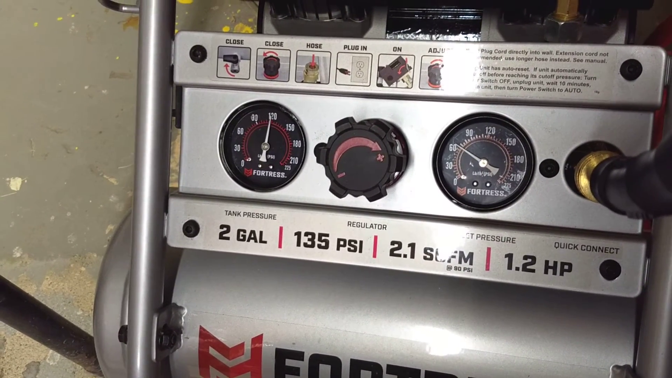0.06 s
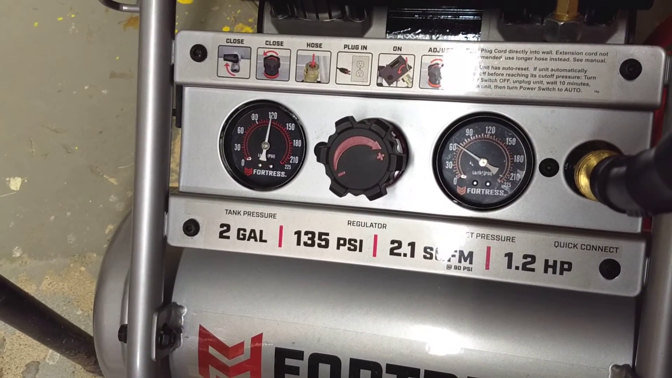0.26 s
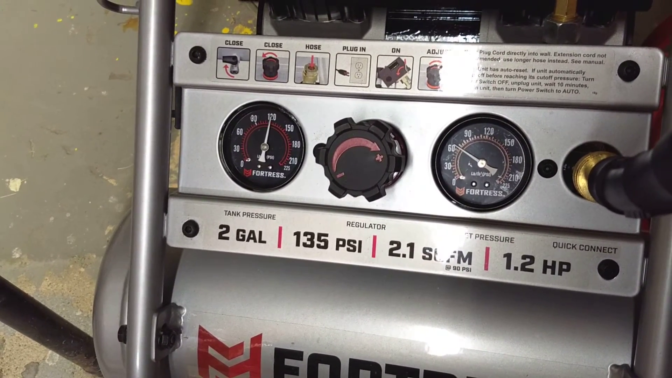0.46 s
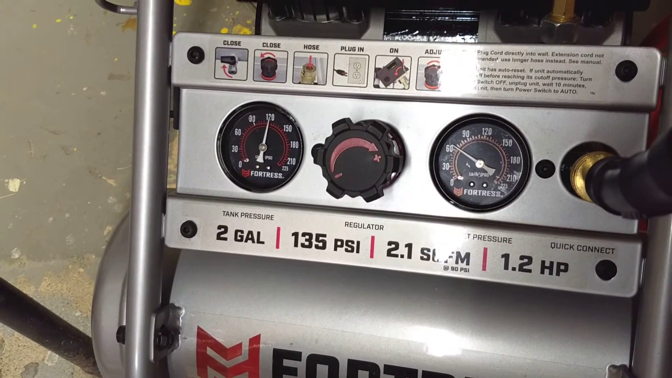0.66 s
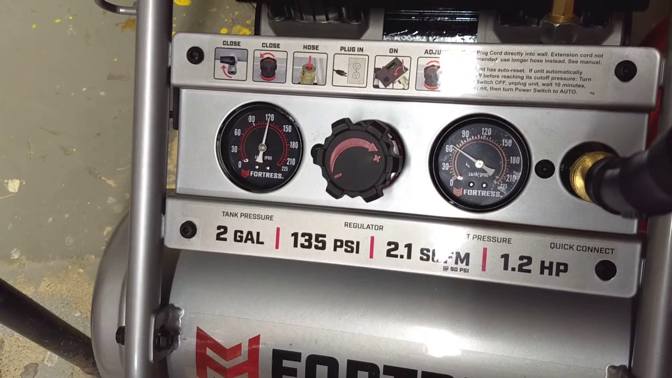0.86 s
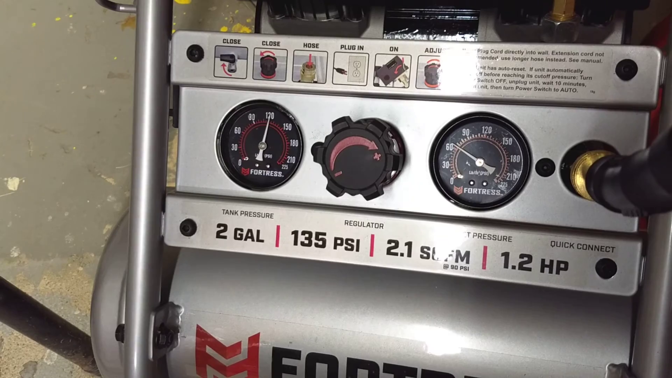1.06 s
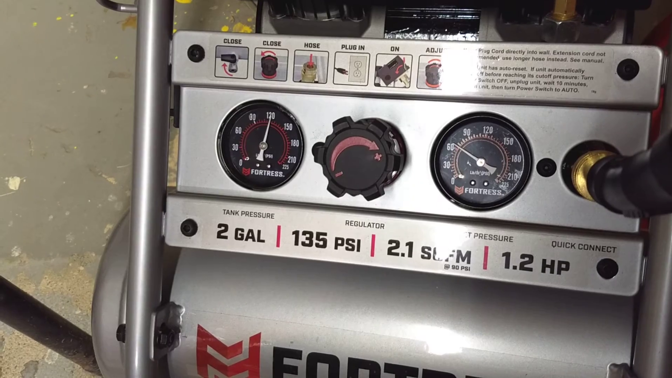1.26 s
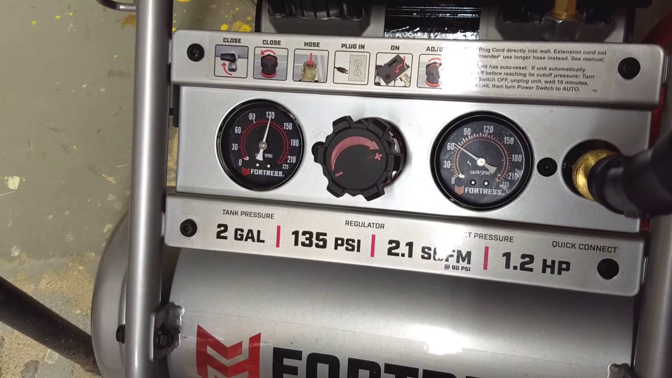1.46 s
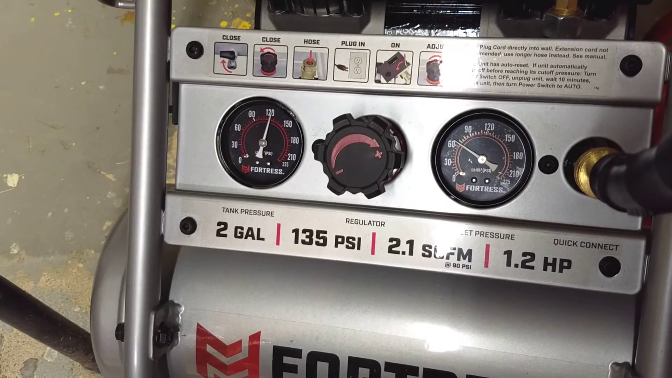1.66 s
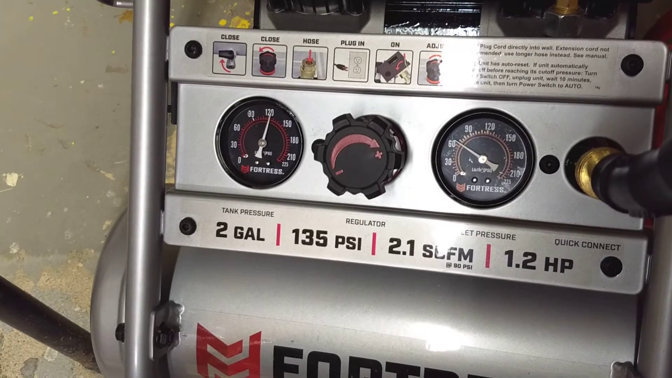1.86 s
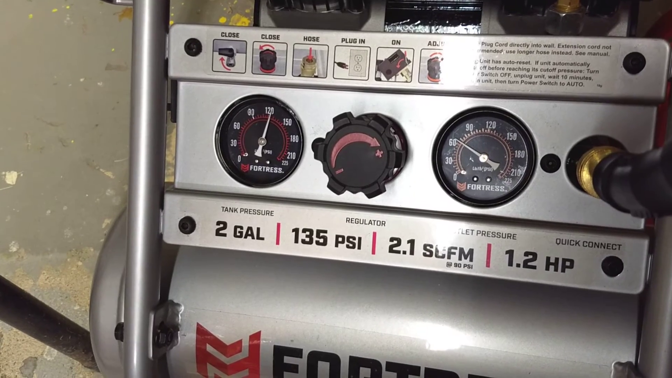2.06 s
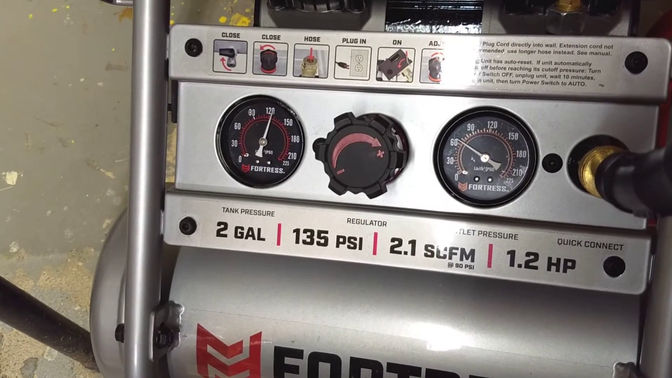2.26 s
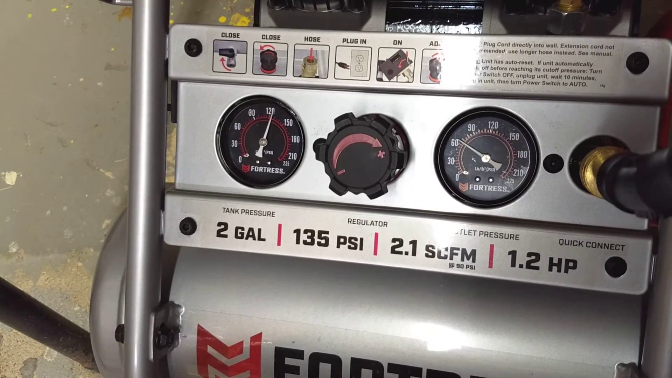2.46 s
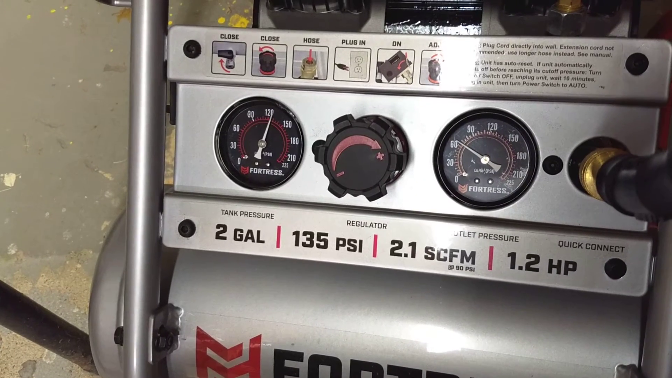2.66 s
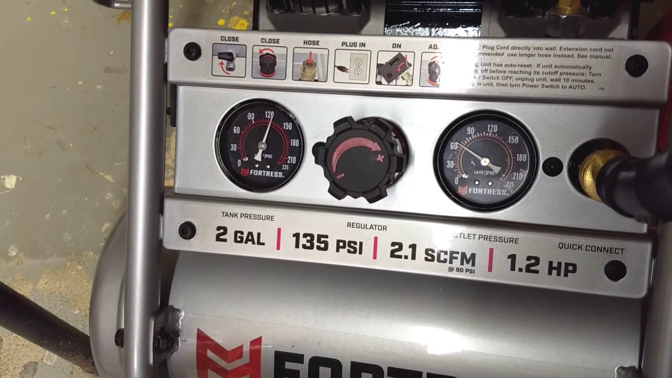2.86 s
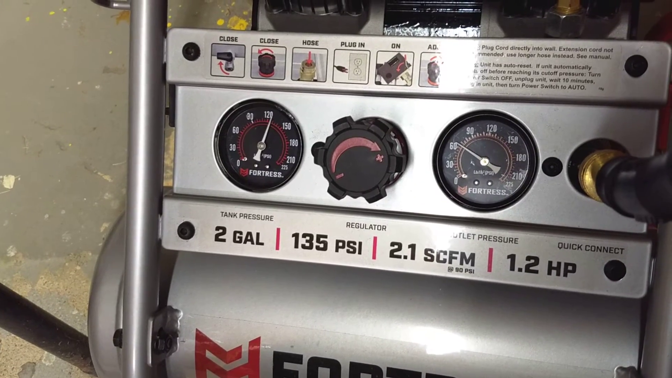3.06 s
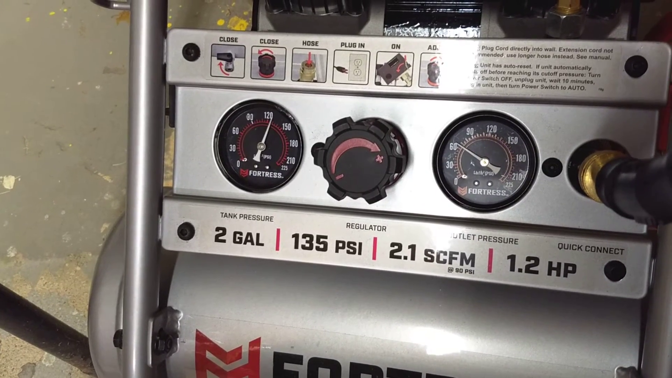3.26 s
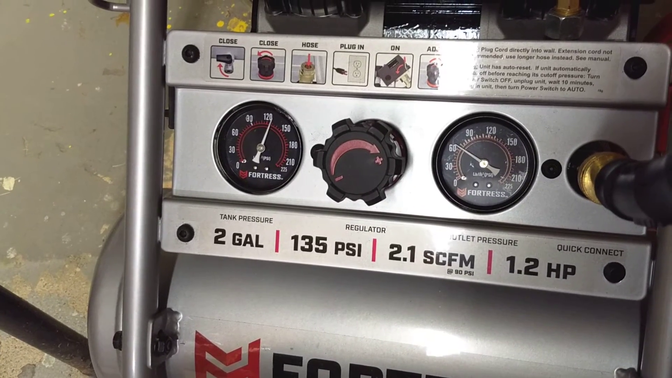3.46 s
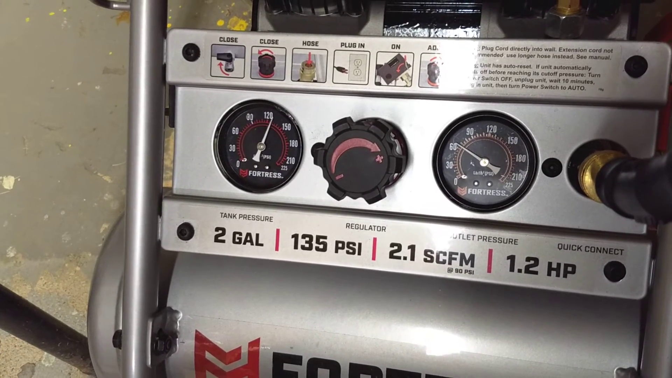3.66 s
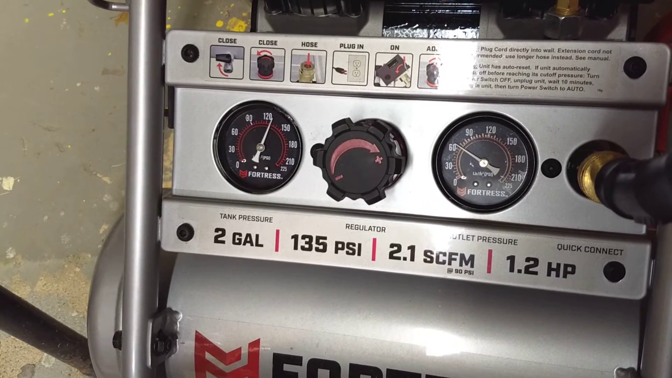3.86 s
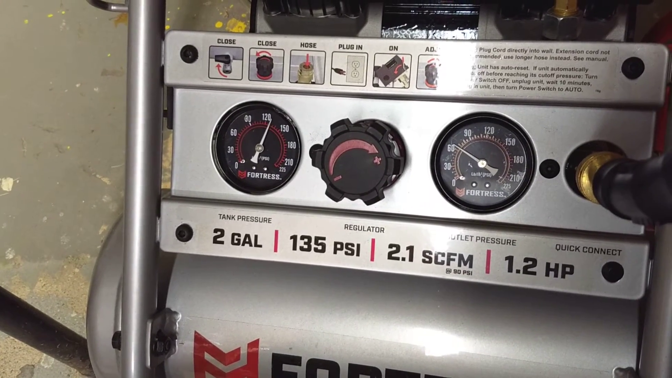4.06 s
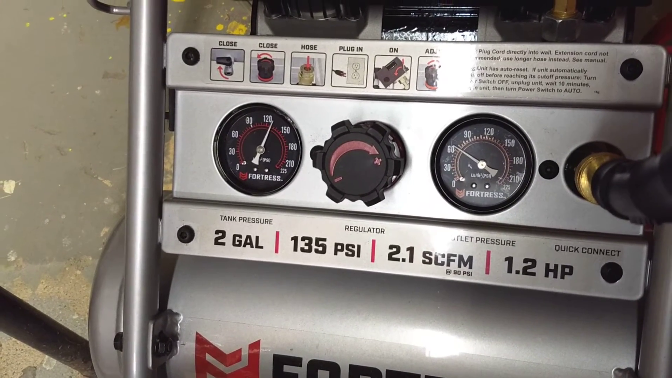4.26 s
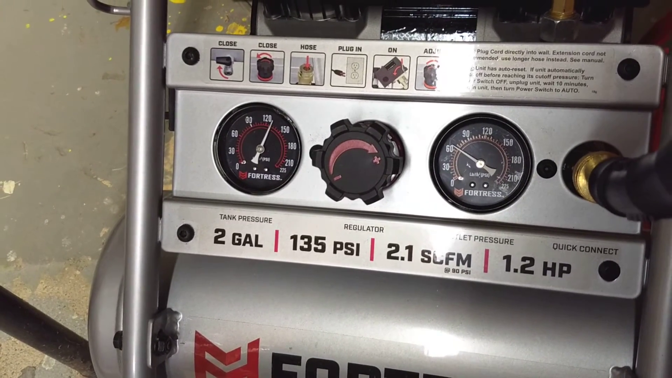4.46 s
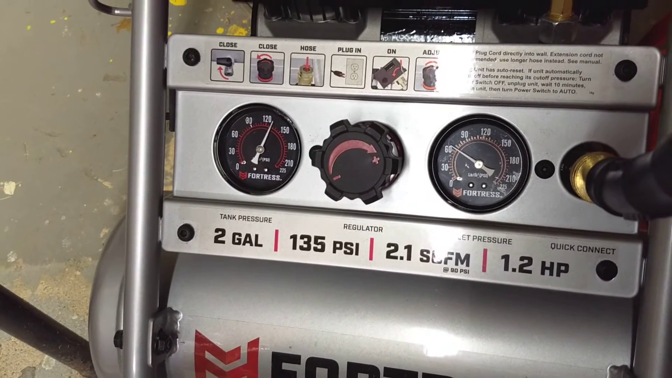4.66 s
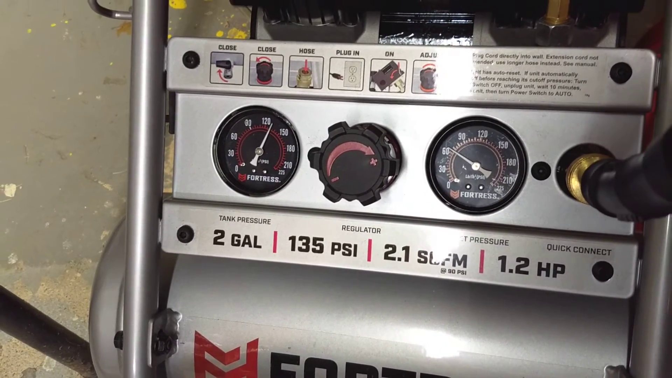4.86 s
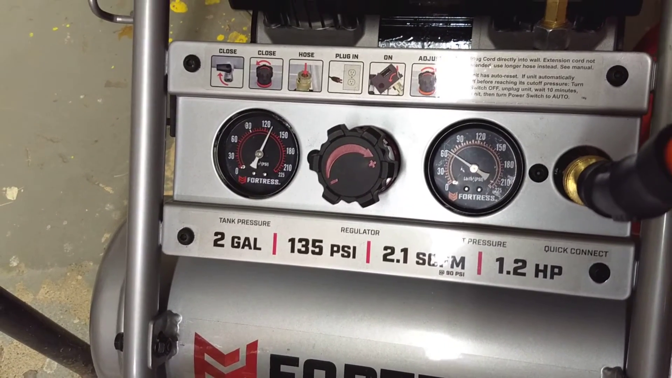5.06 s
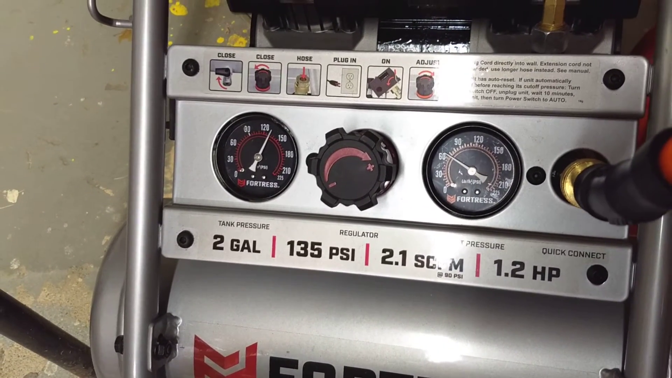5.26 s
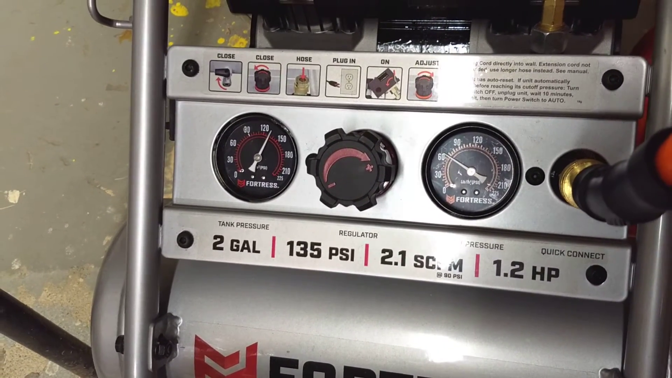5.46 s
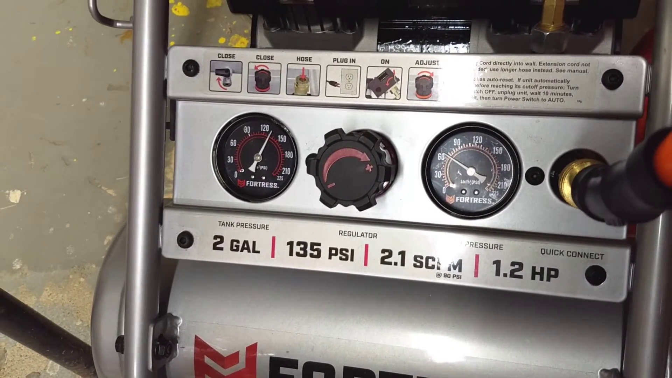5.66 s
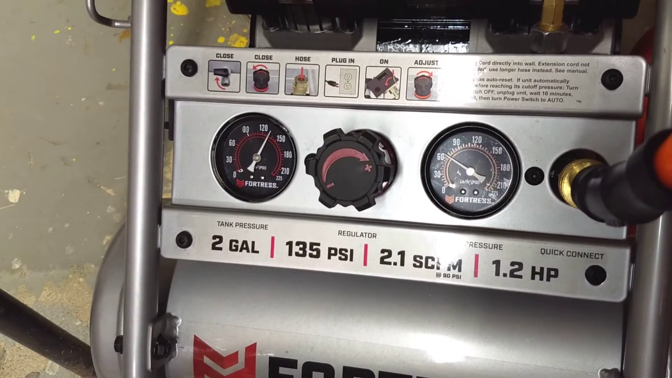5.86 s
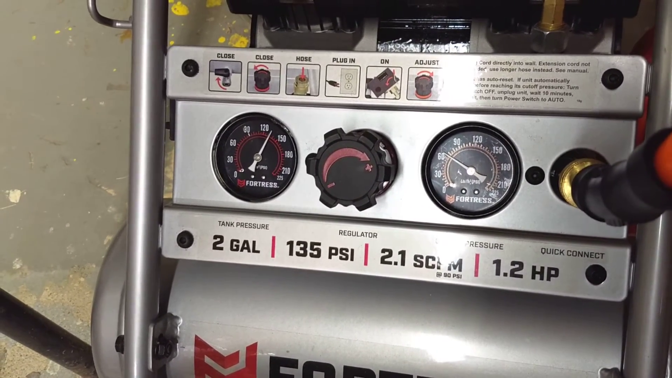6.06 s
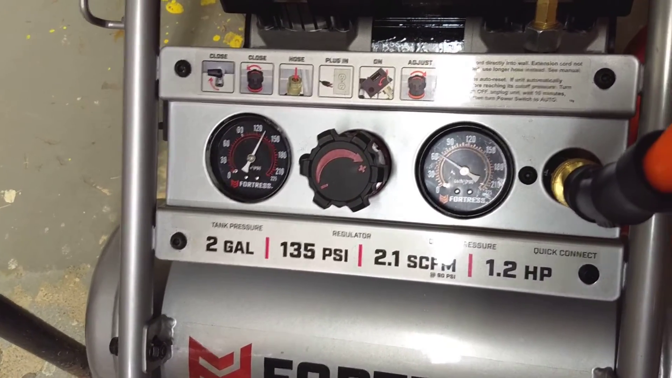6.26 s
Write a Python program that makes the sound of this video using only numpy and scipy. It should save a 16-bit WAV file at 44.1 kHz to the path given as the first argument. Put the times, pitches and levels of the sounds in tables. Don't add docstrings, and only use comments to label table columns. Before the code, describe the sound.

A little compressor fills its tank, its hard metallic stutter repeating about twenty-eight times a second over a humming motor. Thin rattling comes and goes a few times each second and grows slightly. After almost six seconds comes an abrupt click with small knocks, and the clatter gives way to a bright, slowly weakening air hiss. Close stereo microphones, compact indoor space, almost no reverberation.

```python
import sys
import numpy as np
from scipy import signal
from scipy.fft import rfft, irfft, next_fast_len
from scipy.io import wavfile
from scipy.ndimage import uniform_filter1d

SR = 44100
rng = np.random.default_rng(int(sys.argv[2]) if len(sys.argv) > 2 else 0)


def generate_wav(signal):
    frames = np.transpose(np.atleast_2d(signal))
    scaled = np.clip(frames, -1, 1) * 32767
    pcm = np.round(scaled).astype(np.int16)
    wavfile.write(sys.argv[1], SR, pcm)


def makeup_ratio(level_db):
    decades = np.asarray(level_db, float) / 20
    return 10 ** decades


N = 277830
T = np.arange(N) / SR
STOP_S = 5.8625


def read(points, hz, column=1):
    table = np.transpose(points)
    return np.interp(np.log(hz + 1), np.log(table[0] + 1), table[column])


def noise(colour, peaks):
    hz = np.fft.rfftfreq(N, 1 / SR)
    db = read(colour, hz)
    for f, width, top_db in peaks:
        db = db + top_db / (1 + (2 * (hz - f) / width) ** 2)
    return irfft(rfft(rng.standard_normal(N)) * makeup_ratio(db) * np.sqrt(SR / 2), N)


def ring(x, modes):
    t = T[:3000]
    strike = 0
    for hz, width, db in modes:
        strike = strike + makeup_ratio(db) * np.exp(-np.pi * width * t) * np.sin(2 * np.pi * hz * t)
    return signal.oaconvolve(x, strike)[:N]


# t/s, speed/(turns per s)
SHAFT_SPEED = [(0, 28.555), (6.3, 28.582)]


def motor():
    turns = np.cumsum(np.interp(T, *np.transpose(SHAFT_SPEED))) / SR
    hum = 120.047 * T - .18
    beat = hum - 4 * turns
    return turns, hum, beat


# hum multiple, shaft order, level/dB
FRAME_LINES = [(0, 2, -42), (0, 3, -55.5), (0, 4, -34.5), (0, 5, -41), (0, 6, -59), (0, 7, -51),
               (0, 8, -44.5), (0, 9, -42.5), (0, 10, -56), (0, 11, -49), (0, 12, -40.5), (0, 13, -47.5),
               (0, 14, -60), (0, 15, -61), (0, 16, -83), (0, 18, -53), (0, 19, -50), (1, 15, -52),
               (2, 10, -47.5), (3, 6, -50.5), (3, 8, -53), (1, 0, -36.5), (2, 0, -51), (1, 2, -46),
               (1, 5, -43.5)]


def frame(turns, hum):
    set_starts = {(0, 4): -.23, (1, 0): 0}
    out = 0
    for (m, k, db), start in zip(FRAME_LINES, rng.random(len(FRAME_LINES))):
        multiple, order = round(m), round(k)
        start = set_starts.get((multiple, order), start)
        phase = multiple * hum + order * turns + start
        out = out + np.sqrt(2) * makeup_ratio(db) * np.cos(2 * np.pi * phase)
    return out


def flutters(parts, turns, beat, sway, uneven_db, jitter):
    out = 0
    for angle, hz, length, db, gain_db in parts:
        stroke = np.floor(turns - angle + .5).astype(int) + 1
        push, late = rng.standard_normal((2, 200))[:, stroke]
        pull = 2 * np.pi * (beat - 0.85 + 0.15 * rng.uniform(-0.56, 1))
        away = turns - angle + 1 - stroke + jitter * late + 0.0028 * sway * np.sin(pull)
        spread = np.where(away < 0, .55, .38) * length
        swell = np.exp(-(away / spread) ** 2)
        filling_db = gain_db * (T / STOP_S - .5)
        force = makeup_ratio(db + filling_db + uneven_db * push) * (1 + sway * np.cos(pull))
        out = out + force * swell * np.cos(2 * np.pi * hz * away / SHAFT_SPEED[0][1])
    return out


# crank angle/turns, f/Hz, length/turns, level/dB, gain as the tank fills/dB
HEAD_FLUTTERS = [(.0571, 1100, .49, -24.1, 0), (.1286, 1430, .22, -24.3, 5), (.1619, 845, .49, -26.1, 3.5),
                 (.3041, 1019, .37, -19.4, -11), (.4564, 833, .13, -19.2, 0), (.5975, 881, .08, -24.2, -1),
                 (.6193, 1319, .49, -29.1, -3), (.6799, 920, .08, -15.6, -3), (.9414, 959, .35, -18.6, 0)]
PLATE_FLUTTERS = [(.2086, 1730, .24, -13.7, -.5), (.2418, 1922, .15, -26.5, 3.5),
                  (.3846, 1682, .08, -24.2, 0), (.6673, 1925, .29, -31.3, 3), (.7424, 1703, .24, -15.9, -1),
                  (.8892, 1640, .34, -25.1, 2)]
REED_FLUTTERS = [(.0761, 3380, .08, -32, -6), (.1439, 3880, .08, -33, -2), (.1993, 3380, .08, -25, -6),
                 (.2702, 3400, .05, -29, -5), (.3837, 3140, .12, -35, 12), (.6189, 2960, .08, -32, -1),
                 (.6319, 3580, .12, -32, -4), (.7572, 3400, .24, -28, 3), (.7873, 3820, .08, -34, 8),
                 (.8504, 3180, .12, -30, -9), (.9455, 3160, .08, -33, -3),
                 (.12, 2120, 0.15, -25, 0), (0.952, 1940, 0.39, -28, 13), (.24, 2410, 0.43, -23, -4),
                 (.43, 2820, 0.11, -29.5, 8), (.55, 2310, 0.51, -23, 2), (.8, 2170, .2, -35, -4),
                 (.92, 2630, 0.18, -30, -5)]


def valves(turns, beat):
    head = flutters(HEAD_FLUTTERS, turns, beat, sway=0.12, uneven_db=-1.4, jitter=0.00047)
    plate = flutters(PLATE_FLUTTERS, turns, beat, sway=0.021, uneven_db=0.25, jitter=0.00062)
    reeds = flutters(REED_FLUTTERS, turns, beat, sway=0.051, uneven_db=-0.1, jitter=0.00025)
    return makeup_ratio(0.55) * head + makeup_ratio(1.87) * plate + makeup_ratio(0.4) * reeds


SHROUD_SHAKE = [(2, .589, .65), (4, 1.551, .377), (5, .188, .986)]
# f/Hz, width/Hz, level/dB
PANEL_MODES = [(648, 35, -33.7)]
# f/Hz, width/Hz, level/dB
LIP_MODES = [(687.5, 40, -33.3), (775, 60, -41.7)]
# f/Hz, width/Hz, level/dB
SHROUD_MODES = [(645, 35, -25), (690, 40, -26), (545, 30, -31), (770, 60, -34), (1000, 90, -33),
                (1300, 90, -38)]


def shroud(turns, hum, beat, loose=.2):
    shake = np.cos(2 * np.pi * (hum + .639))
    for order, size, start in SHROUD_SHAKE:
        shake = shake + size * np.cos(2 * np.pi * (order * turns + start))
    play = 1.712
    touch = makeup_ratio(1.3) * np.maximum(shake - play, 0) ** 1.5
    together = np.maximum(np.cos(2 * np.pi * (beat - .77)) + loose, 0) ** .5
    chatter = makeup_ratio(-29.5) * together * rng.standard_normal(N)
    rattle = ring(touch, PANEL_MODES) - ring(touch, LIP_MODES) + ring(chatter, SHROUD_MODES)
    rattle = rattle * makeup_ratio(3 * (T / STOP_S - 1.0))
    return signal.sosfiltfilt(signal.butter(3, 520, "highpass", fs=SR, output="sos"), rattle)


# f/Hz, level/(dB per Hz)
RUSH_COLOUR = [(30, -99), (100, -73), (200, -82), (330, -72.5), (470, -75), (650, -58.5), (1000, -56.5),
               (1600, -61), (2500, -63), (3500, -65.5), (5000, -69), (7000, -76), (10000, -83.5),
               (15500, -84)]
# f/Hz, width/Hz, level/dB
TANK_TONES = [(2316, 82, 4.3), (3310, 37, 5.2), (3656, 37, 10.7), (5647, 38, 11.3), (6810, 410, 5.8),
              (7950, 240, 7.3)]


def rush(turns):
    both_db = 1.13 * np.cos(4 * np.pi * (turns - .28))
    first_db = 0.66 * np.cos(2 * np.pi * (turns - .35))
    return noise(RUSH_COLOUR, TANK_TONES) * makeup_ratio(both_db + first_db)


# f/Hz, t60/s
ROOM_DECAY = [(60, 0.36), (300, 0.2), (1000, 0.16), (2000, 0.5), (8000, 0.033)]


def room(x):
    hz, t, z = signal.stft(rng.standard_normal(SR // 2), SR, nperseg=256)
    decay = makeup_ratio(-60 * t / read(ROOM_DECAY, hz)[:, None])
    tail = signal.istft(z * decay, SR, nperseg=256)[1]
    return signal.fftconvolve(x, tail / np.linalg.norm(tail))[:N]


# f/Hz, sharpness for the pump, sharpness for the jet, likeness of side and mid,
# extra phase/rad
PORT_COMB = [(100, 1.9, 0.45, 1, 0.054), (673, 3.9, 1.8, 0.63, 0.11), (1170, 1.24, 1.1, 0.18, 0.0087),
             (1890, 0.95, 1.7, 0.94, -0.4), (2170, 0.72, 4.2, 0.11, -0.064), (3500, 0.82, 3.4, .2, 0.0068),
             (4830, 1.2, 0.82, 0.38, -0.11), (5700, 0.97, 0.89, 0.95, 0.14), (9400, 0.35, 0.3, 0.66, 0.061),
             (15500, 0.87, 0.44, .3, -0.53)]
# f/Hz, level/dB
PORT_TILT = [(57, 11), (110, 2), (200, 2), (380, 2.3), (700, 0), (1150, -.6), (1700, -2.6), (2300, -1.2),
             (4400, 0), (15000, -1.5)]


def ports(x, column):
    port_s, in_phase_hz = .00043, 1150
    size = next_fast_len(N + SR // 10)
    hz = np.fft.rfftfreq(size, 1 / SR)
    half = np.pi * port_s * (np.maximum(hz, 480) - in_phase_hz) * np.minimum(hz / 480, 1) ** 0.4
    half = half + read(PORT_COMB, hz, column=4)
    sharpness = read(PORT_COMB, hz, column)
    mid = np.sign(np.cos(half)) * abs(np.cos(half)) ** sharpness
    side = np.sign(np.sin(half)) * abs(np.sin(half)) ** sharpness
    both = np.hypot(mid, side)
    like = np.clip(read(PORT_COMB, hz, column=3), 0, 1)
    delay = np.interp(hz, np.linspace(0, SR / 2, 300), rng.uniform(0, .008, 300))
    scatter = np.exp(-2j * np.pi * np.cumsum(delay) * hz[1])
    side = side * (1j * like + np.sqrt(1 - like ** 2) * scatter)
    tilt = makeup_ratio(read(PORT_TILT, hz) / 2)
    left_right = np.array([(mid + side) * tilt, (mid - side) / tilt])
    return irfft(left_right * rfft(x, size) / both, size)[:, :N]


# f/Hz, level/(dB per Hz)
JET_COLOUR = [(60, -103), (200, -89), (450, -94), (600, -78), (1900, -82), (2900, -82), (4500, -74.5),
              (5300, -67.5), (7500, -65), (9000, -70), (12000, -71), (15500, -70)]
# f/Hz, width/Hz, level/dB
NOZZLE_TONES = [(2280, 270, 13), (2680, 180, 7.1), (3470, 530, 4.2), (5050, 120, 10.4), (6360, 29, 14),
                (6600, 130, 6.8), (7530, 360, 2.8), (7880, 120, 11.2), (10000, 310, 3.8), (10900, 200, 6.6),
                (12000, 400, 4.5), (14000, 200, 5.8), (14400, 300, 7.4), (15550, 150, 7)]


def jet():
    flicker = uniform_filter1d(rng.standard_normal(N), size=400) * 20
    sag_db = -3.5 * (T - STOP_S)
    surge_db = 2.5 * np.exp(-((T - 5.977) / 0.015) ** 2)
    flow_db = 0.7 + sag_db + surge_db + 0.7 * flicker
    opening = np.clip((T - 5.8635) / 0.0014, 0, 1)
    return noise(JET_COLOUR, NOZZLE_TONES) * makeup_ratio(flow_db) * opening


# f/Hz, width/Hz, level/dB
SNAP_MODES = [(750, 800, -1), (6300, 2200, .5), (2800, 2500, -4)]
# t/s, f/Hz, level/dB, t60/s
FRAME_THUDS = [
    (5.912, 230, -40, 0.048),
    (5.875, 113, -44, 0.28),
    (5.87, 1100, -40, 0.16),
    (5.87, 665, -44, 0.3),
]


def unloader():
    out = jet() + ring(np.arange(N) == round(5.8636 * SR), SNAP_MODES)
    for at, hz, db, t60 in FRAME_THUDS:
        t = np.maximum(T - at, 0)
        out = out + makeup_ratio(db - 60 * t / t60) * np.sin(2 * np.pi * hz * t)
    return out


def scene():
    turns, hum, beat = motor()
    running = np.exp(-np.maximum(T - STOP_S, 0) / 0.0017)
    pump = frame(turns, hum) + valves(turns, beat) + shroud(turns, hum, beat) + rush(turns)
    pump = pump * running
    tail = makeup_ratio(-28) * room(pump)
    walls = makeup_ratio(-10.5) * np.array([rush(turns), rush(turns)]) * running
    treble = signal.butter(4, 8000, "highpass", fs=SR, output="sos")
    fizz = makeup_ratio(-5.3) * signal.sosfilt(treble, [jet(), jet()])
    return ports(pump + tail, column=1) + walls + fizz + ports(unloader(), column=2)


def top_cut(x):
    return signal.sosfilt(signal.butter(12, 16900, fs=SR, output="sos"), x)


def record(dry):
    bass_hz, edge_hz = 42, 15780
    hz = np.fft.rfftfreq(2 * N, 1 / SR)
    band = (hz < edge_hz) / (1 + (bass_hz / (hz + 1)) ** 8)
    mix = irfft(rfft(dry, 2 * N) * band, 2 * N)[:, :N]
    return top_cut(mix)


dry = scene()
out = record(dry)
generate_wav(out)
```